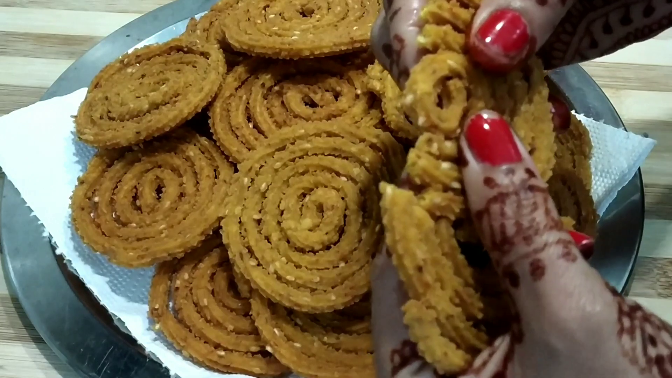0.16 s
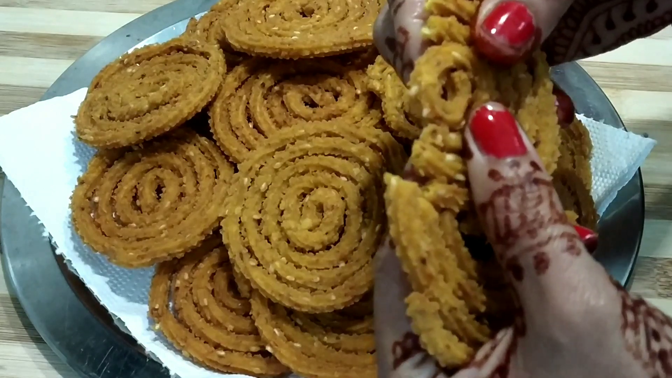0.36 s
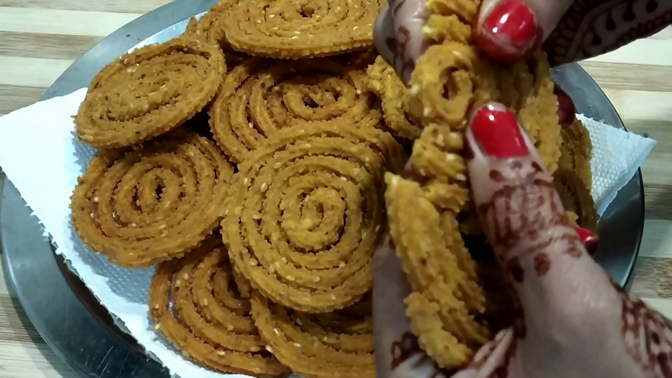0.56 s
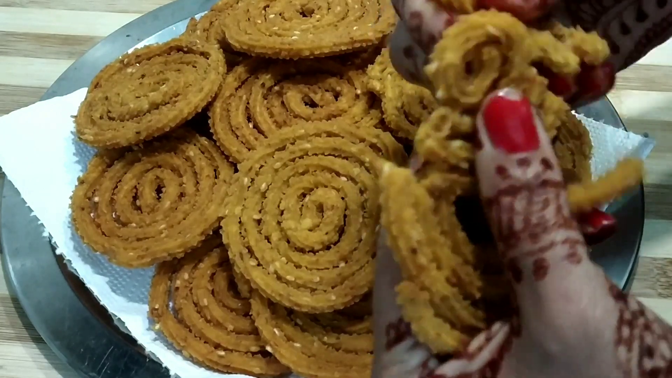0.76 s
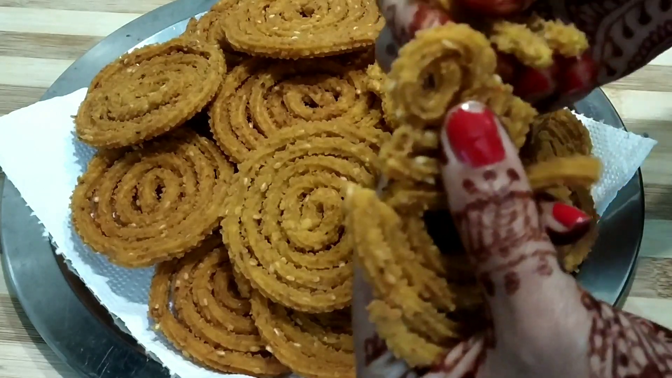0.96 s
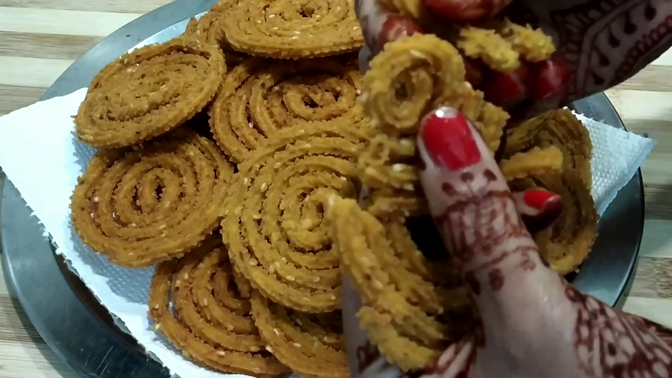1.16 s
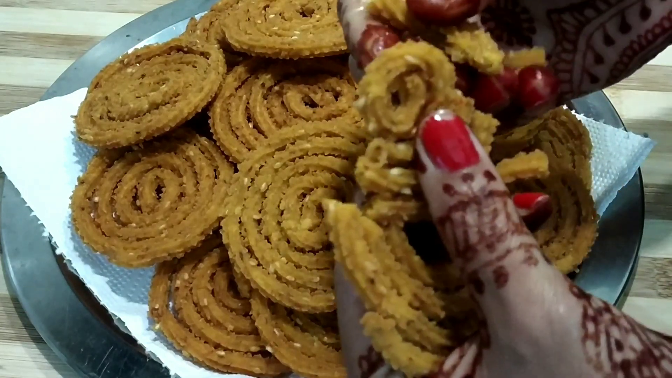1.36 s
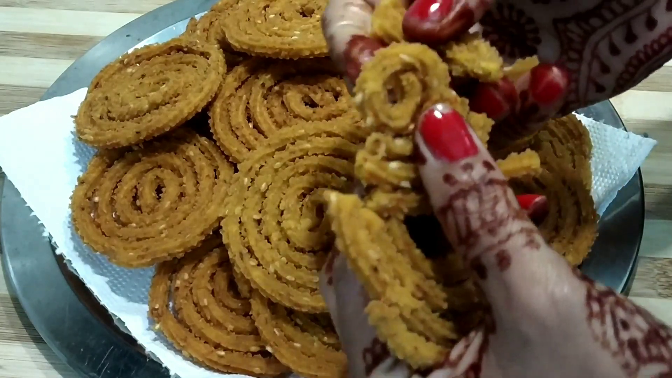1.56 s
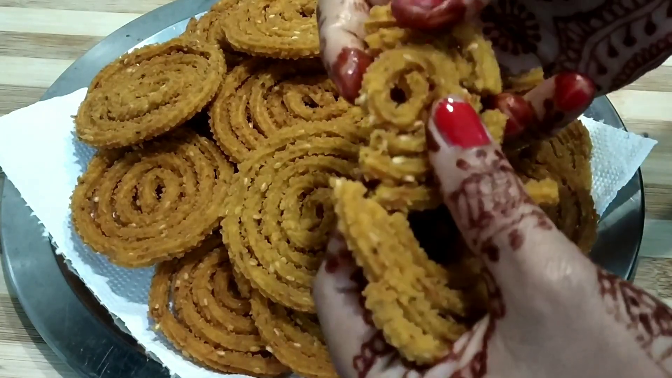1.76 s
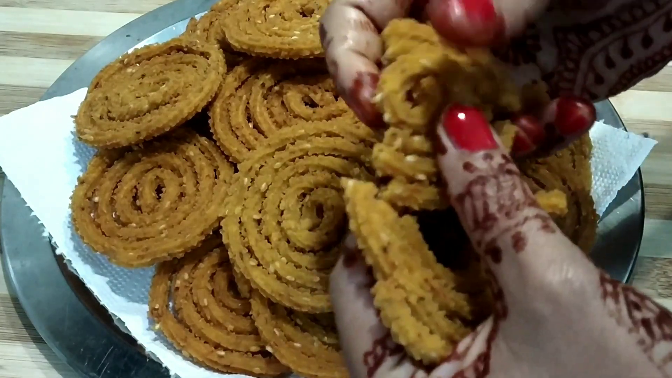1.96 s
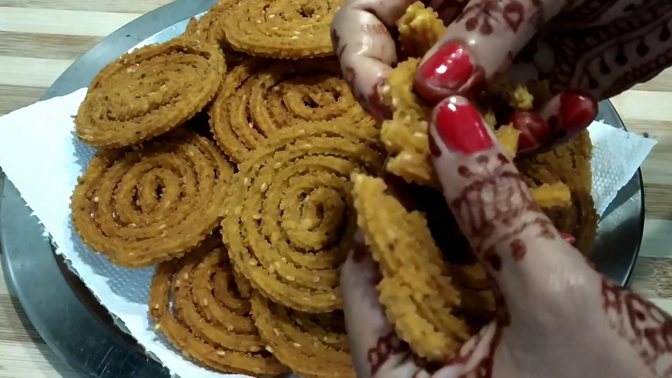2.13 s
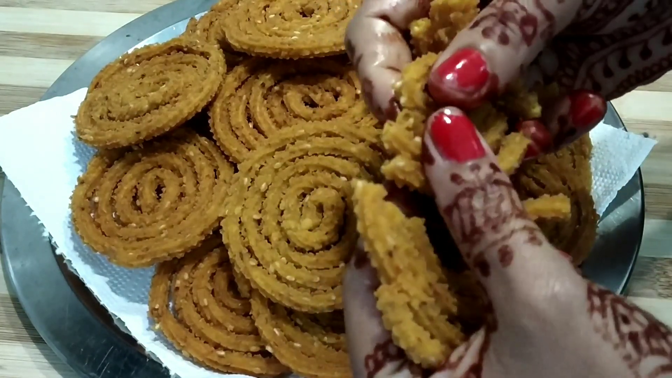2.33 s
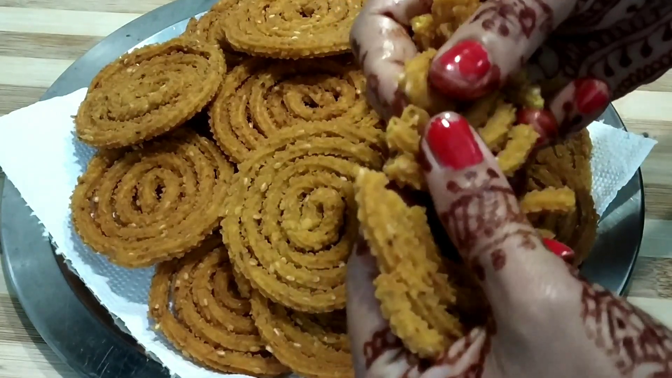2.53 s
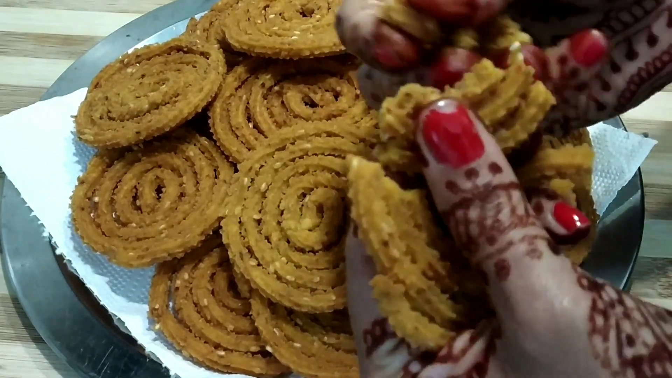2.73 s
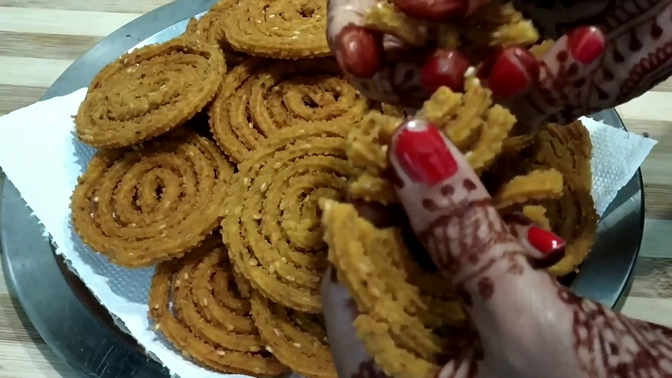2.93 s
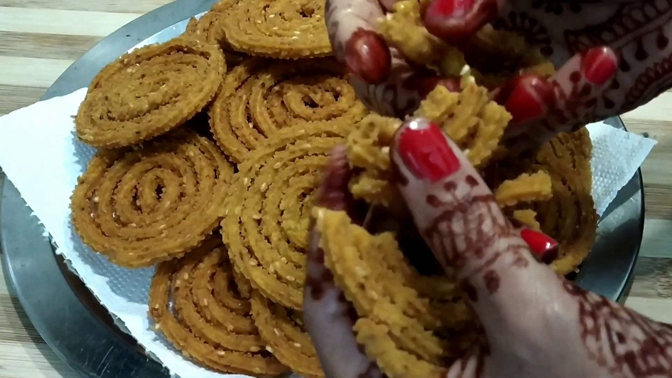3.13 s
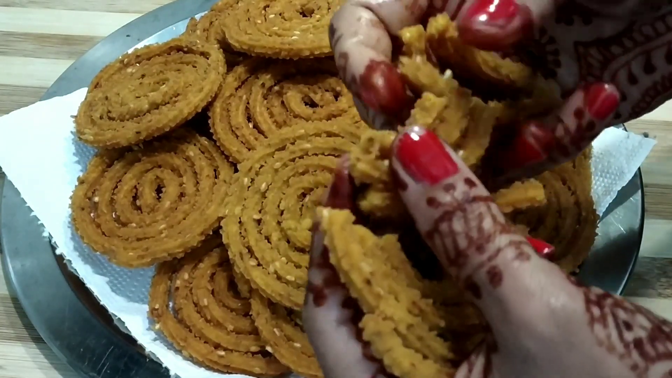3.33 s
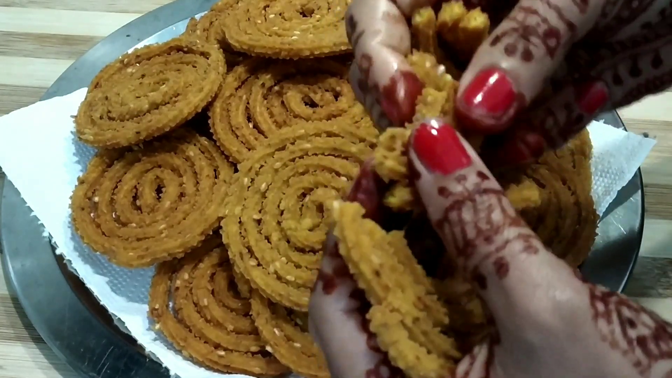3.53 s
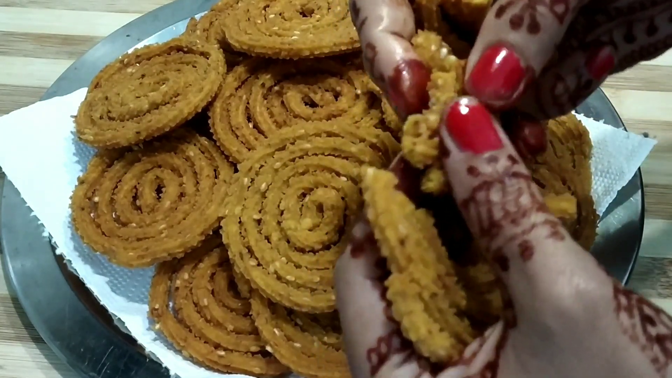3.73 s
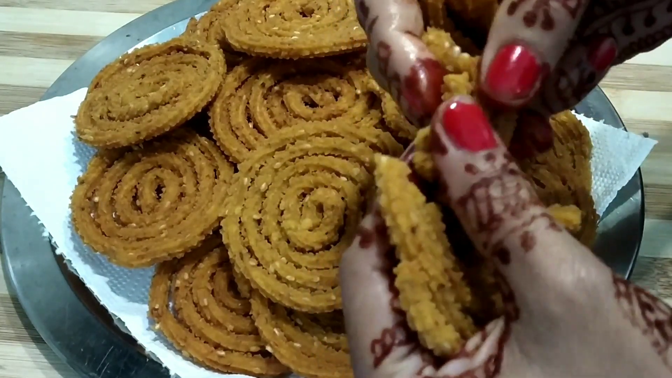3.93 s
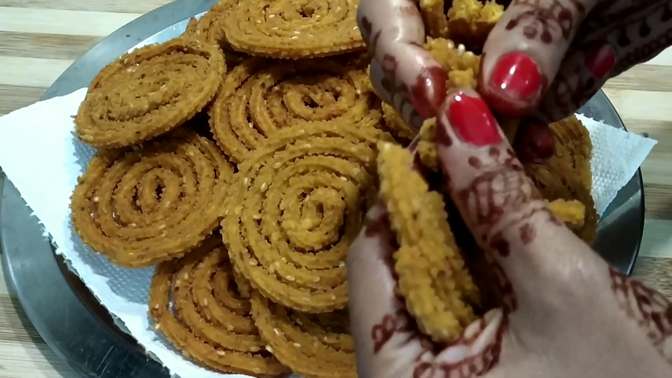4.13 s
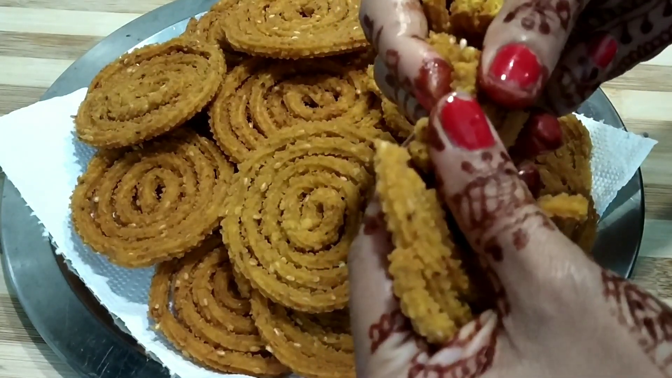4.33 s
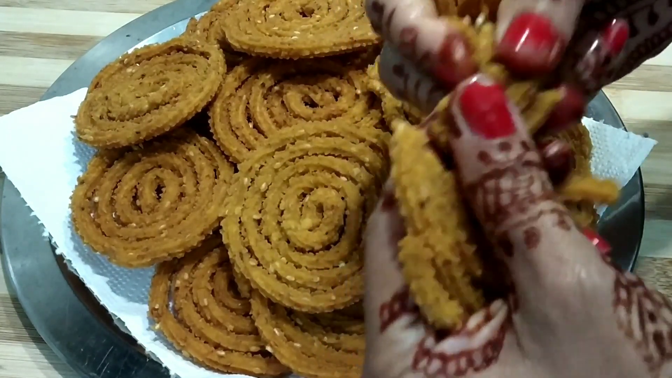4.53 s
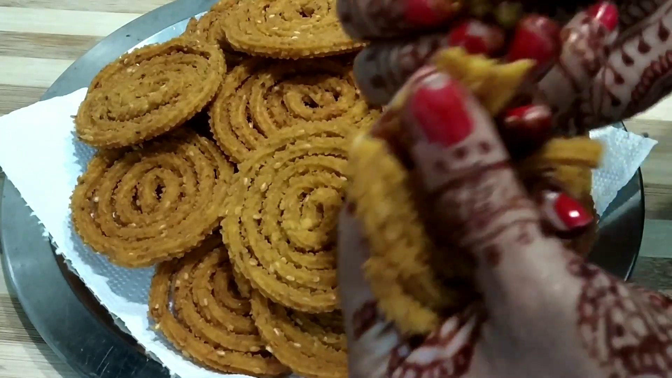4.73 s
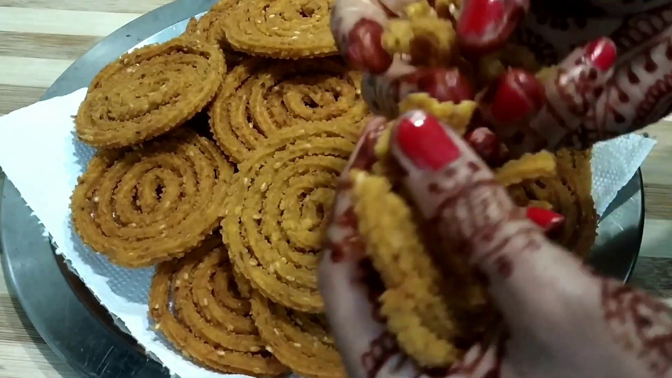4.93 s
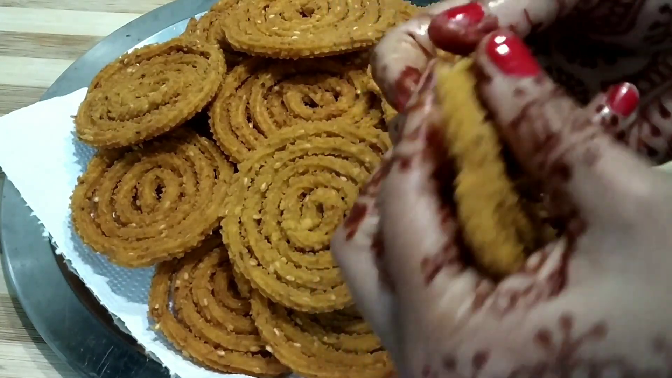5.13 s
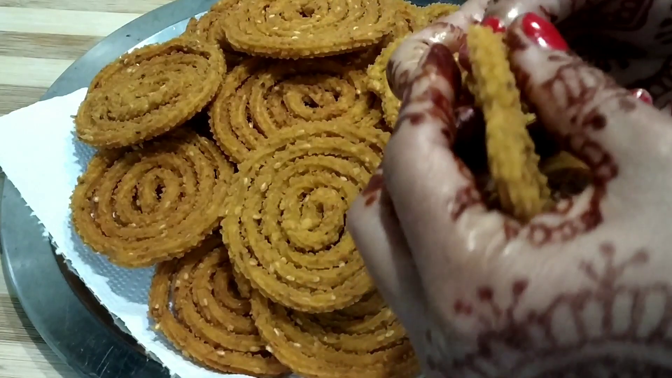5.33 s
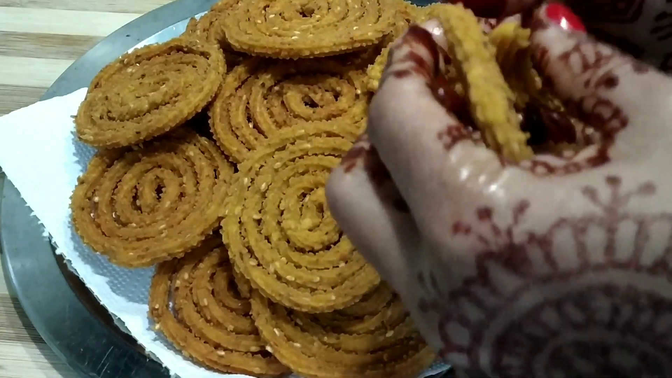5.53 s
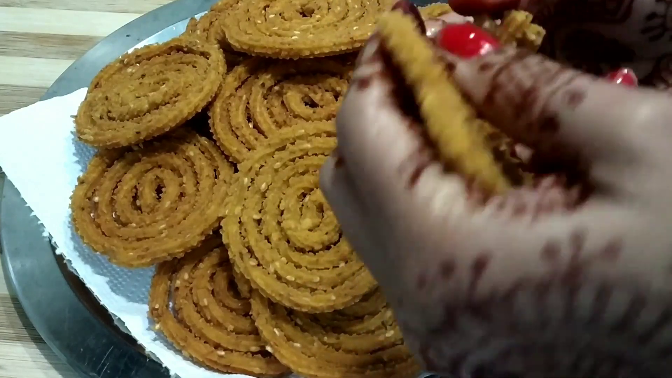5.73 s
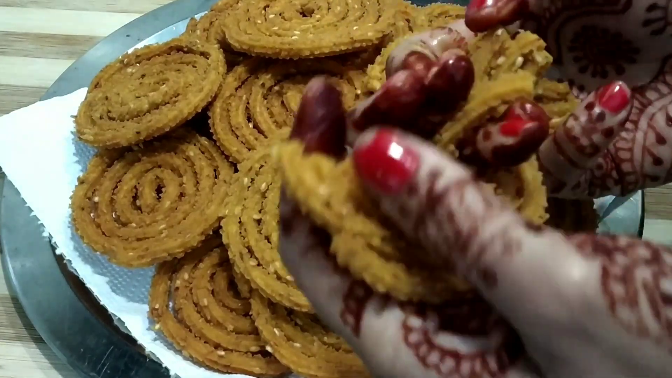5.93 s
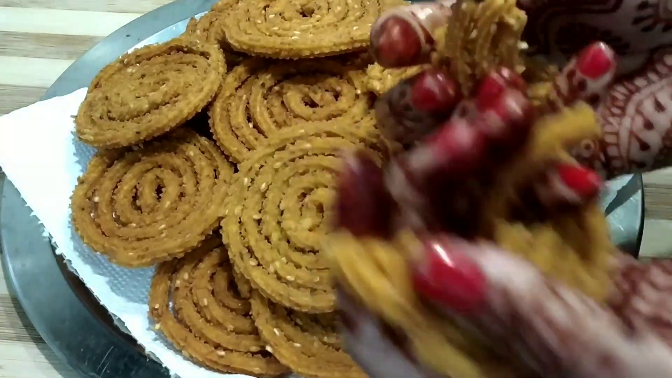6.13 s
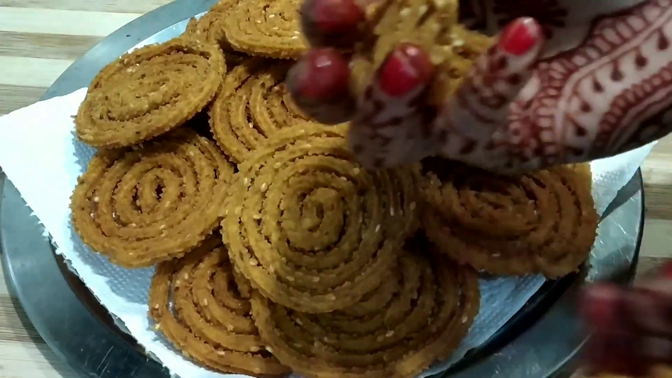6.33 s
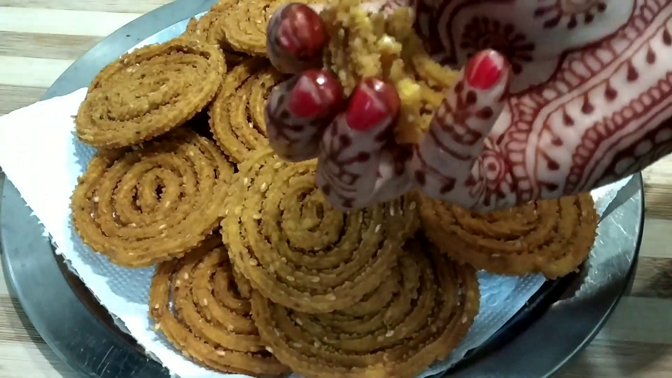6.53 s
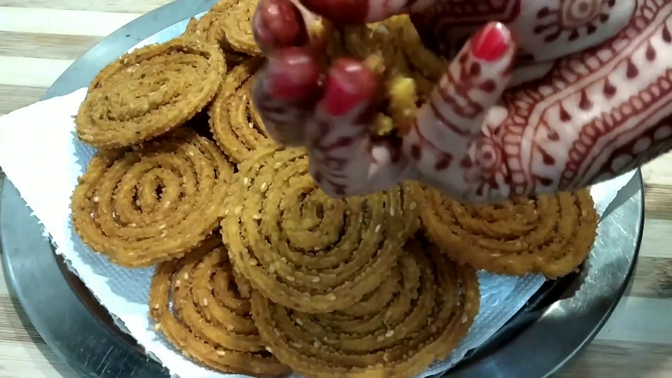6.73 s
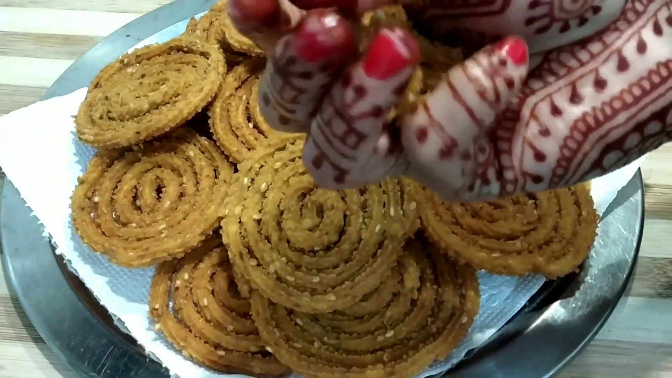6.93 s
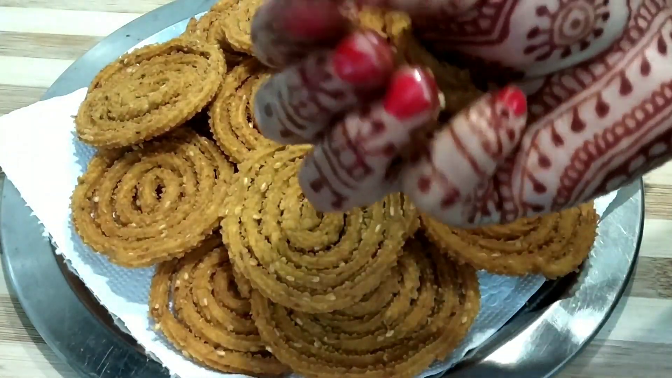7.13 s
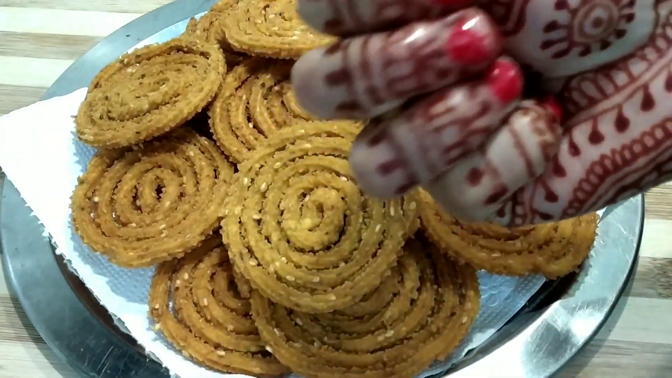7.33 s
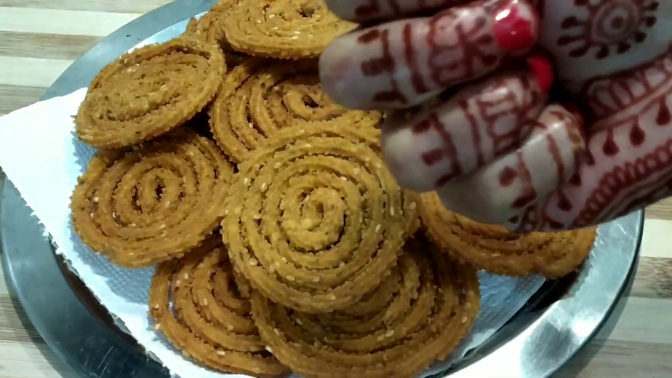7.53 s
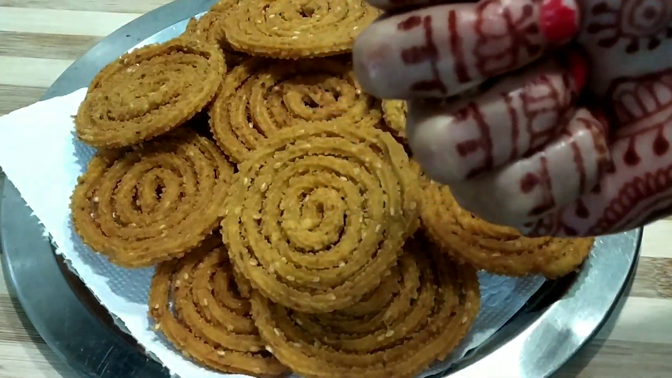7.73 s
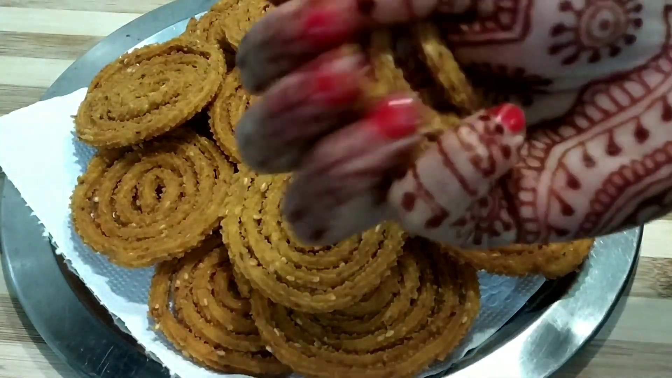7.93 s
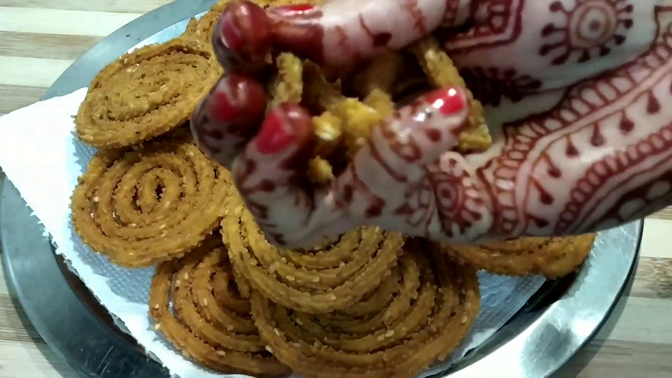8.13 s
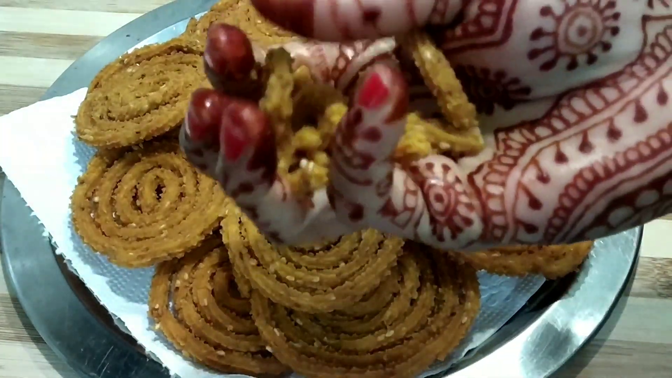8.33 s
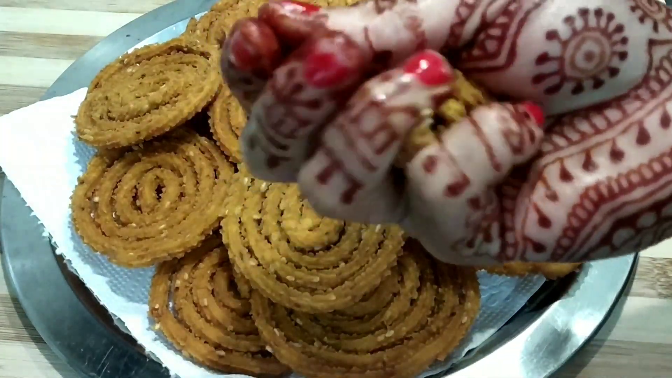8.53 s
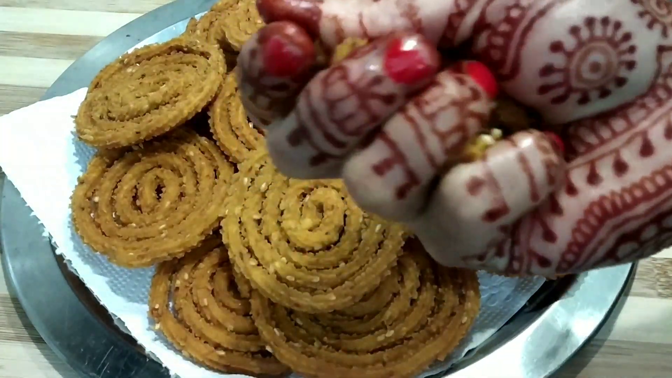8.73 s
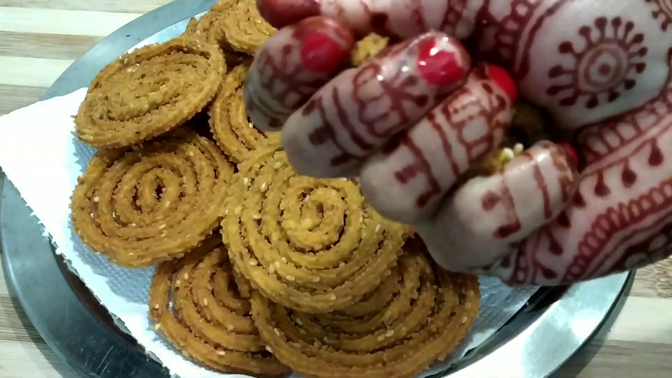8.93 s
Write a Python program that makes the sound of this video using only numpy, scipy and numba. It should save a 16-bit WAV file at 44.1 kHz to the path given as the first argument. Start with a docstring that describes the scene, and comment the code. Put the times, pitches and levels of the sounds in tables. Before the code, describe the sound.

Over a low fan rumble and light hiss, a brittle fried snack is broken by hand three times, each break a sharp, dry crackle close to the microphone. After a quiet spell and a soft rub of skin, it is crushed in a closed hand, crunching in two waves with a slightly hollow ring. The small kitchen adds a short echo.

```python
"""Over fan hum and mic hiss in a small tiled kitchen, hands snap crisp fried spirals close to a phone,
near 0.7, 2.5 and 4.2 s. At 6 s skin rustles as the grip changes. From 7 s to the end a closed fist
crushes one spiral. Each break is a run of tiny fractures: thin shards tick brightly, the hollow of
the hands rings lower, and the room adds a short tail."""
import sys
import numpy as np
from scipy import signal
from scipy.fft import rfft, irfft, next_fast_len
from scipy.io import wavfile
from scipy.ndimage import uniform_filter1d
from numba import njit

SR = 44100
rng = np.random.default_rng(int(sys.argv[2]) if len(sys.argv) > 2 else 0)


def file_out(sig):
    """Save sig as 16-bit WAV at sys.argv[1]."""
    # one column per channel
    cols = np.atleast_2d(sig).T
    # limit, then scale
    lim = np.clip(cols, -1, 1)
    pcm = np.round(lim * 32767).astype(np.int16)
    wavfile.write(sys.argv[1], SR, pcm)


N = 400428


def undb(db):
    """Decibels to gain."""
    return 10 ** (np.asarray(db) / 20)


def shape(x, points):
    """Filter x by (freq_hz, gain_db) points joined on a log-frequency axis."""
    hz, db = np.transpose(points)
    size = next_fast_len(N)
    bin_hz = np.maximum(np.arange(size // 2 + 1) * SR / size, 1)
    gain = undb(np.interp(np.log(bin_hz), np.log(hz), db))
    return irfft(rfft(x, size) * gain, size)[..., :N]


def walk(rate_hz):
    """Slewed random steps, spread near 1."""
    hold = int(SR / rate_hz)
    return uniform_filter1d(np.repeat(rng.standard_normal(N // hold + 1), hold), hold)[:N]


@njit
def grains(n, at_sample, hz, cycles, gain):
    """Damped rings of energy gain^2, each falling 20 dB per `cycles` periods."""
    out = np.zeros(n)
    for g in range(len(at_sample)):
        first = int(np.ceil(at_sample[g]))
        damp = np.log(10.) * hz[g] / cycles[g]
        pole = (2j * np.pi * hz[g] - damp) / SR
        phasor = gain[g] * np.sqrt(4 * damp) * np.exp(pole * (first - at_sample[g]))
        step = np.exp(pole)
        for j in range(max(first, 0), min(n, first + int(3 * cycles[g] * SR / hz[g]))):
            out[j] += phasor.imag
            phasor *= step
    return out


def air(noise_db=-59.5, split_hz=900, flicker_db=0.5, waver_db=1.5, common_share=0.25):
    """Steady mic hiss; fan rumble that swells and flickers; faint motor tones."""
    # fan rumble and hiss spectrum: freq_hz, density_db
    spectrum = [(30, -59), (167, -6.5), (235, 1), (399, -3.5), (792, -7.5), (1030, -6.5), (2050, -8.5),
                (16000, -9.5)]
    # swell below split_hz: time_s, gain_db
    rumble_swell = [(0, 8), (2, 5), (6, 5), (9.08, 7)]
    # fan motor tones: pitch_hz, level_db
    motor_tones = [(231.5, -80.5), (1061, -76)]
    t = np.arange(N) / SR
    noise = shape(rng.standard_normal((3, N)), spectrum)  # left, right, common
    noise = noise * undb(noise_db) / noise.std()
    low = signal.sosfiltfilt(signal.butter(2, split_hz, fs=SR, output="sos"), noise)
    hiss = noise[:2] - low[:2]
    swell = undb(np.interp(t, *np.transpose(rumble_swell)))
    rumble = np.sqrt(1 - common_share) * low[:2] + np.sqrt(common_share) * low[2]
    rumble = rumble * swell * undb(flicker_db * walk(25))
    hum = 0
    for hz, db in motor_tones:
        gain = (swell if hz < split_hz else 1) * undb(db + waver_db * walk(5.4))
        hum += gain * np.sin(2 * np.pi * hz * t + 0.28 * walk(2.4))
    return hiss + rumble + hum


def kitchen(x, tail_db=-33, onset_s=0.00012):
    """Add the tiled room's tail: decaying octave bands of noise, different at each mic port."""
    # room decay: freq_hz, t60_s
    decay = [(500, 0.25), (4000, 0.42), (14000, 0.28)]
    hz, t60_s = np.transpose(decay)
    t = np.arange(SR // 2) / SR
    tail = 0
    for centre_hz in 250 * 2 ** np.arange(7):
        edges_hz = [centre_hz / np.sqrt(2), min(centre_hz * np.sqrt(2), .49 * SR)]
        band = signal.butter(2, edges_hz, "bandpass", fs=SR, output="sos")
        fall = np.exp(-np.log(1000) * t / np.interp(np.log(centre_hz), np.log(hz), t60_s))
        tail += signal.sosfilt(band, rng.standard_normal((2, len(t)))) * fall
    tail = tail * undb(tail_db) * (1 - np.exp(-t / onset_s))
    return x + signal.fftconvolve(x.mean(axis=0)[None], tail, axes=1)[:, :N]


def rustle(flicker_db=3.5):
    """The grip changes: soft, uneven friction of skin on skin."""
    # rubbing envelope: time_s, level_db
    envelope = [(6.0, -85), (6.1, -57), (6.4, -56), (6.901, -60)]
    # friction spectrum: freq_hz, density_db
    spectrum = [(150, -10), (350, 2.5), (3500, -2.5), (4750, 0), (5600, -2.5), (12000, -4)]
    noise = shape(rng.standard_normal((2, N)), spectrum)
    level_db = np.interp(np.arange(N) / SR, *np.transpose(envelope), left=-150, right=-150)
    return noise / noise.std() * undb(level_db + flicker_db * walk(45))


def knocks(count=6, spread_s=0.00412, detune=0.43, cycles=3.0):
    """A broken piece lands on the pile with a dull knock: a few damped rings of scattered pitch, centred."""
    # knocks: start_s, energy_db, pitch_hz
    landings = [(0.712, -73.5, 710), (0.743, -69, 295), (2.618, -77, 450), (4.108, -77, 1003),
                (4.219, -82, 780), (4.521, -76, 860)]
    start_s, energy_db, pitch_hz = np.transpose(landings)[:, :, None]
    late, tune = np.moveaxis(rng.random((len(start_s), count, 2)), 2, 0)
    at_sample = (start_s + spread_s * late).ravel() * SR
    ring_hz = (pitch_hz * np.exp(detune * (2 * tune - 1))).ravel()
    gain = np.repeat(undb(energy_db), count) / np.sqrt(count)
    rings = grains(N, at_sample, ring_hz, np.full(len(gain), cycles), gain)
    low_cut = signal.butter(3, 200, "highpass", fs=SR, output="sos")  # small pieces move no bass
    return signal.sosfilt(low_cut, rings)


def fractures(at_s, energy_db, hollow_db, lag_samples=1.0, pan_db=1.0, retune=0.11, ring_scatter_db=5.0):
    """A shard tick and a hollow ring per fracture; each mic port hears it from a different side."""
    # resonance of the cupped hands as their volume changes: time_s, pitch_hz
    hollow_pitch = [(7.27, 2700), (7.42, 2330), (7.7, 2160), (7.9, 3030), (8.7, 3120), (8.9, 2540)]
    # sideways drift of the hands: time_s, left_minus_right_db
    hands_side = [(0.7, 0.5), (2.0, -0.5), (2.6, -3.5), (4.2, -3), (6.8, -11.5), (7.3, 0.6), (8.0, -6.5),
                  (9.0, -3.5)]
    shard_low_hz, shard_high_hz, open_hz_per_db = 4800, 16700, 198
    shard_cycles, hollow_cycles = 2.83, 2.8
    body_hz, body_share = 816, 0.12  # some fractures ring the thick piece instead of the hollow
    fineness, length, pick = rng.random((len(at_s), 3)).T
    detune, polarity, lag, pan, skew, strength = rng.standard_normal((len(at_s), 6)).T
    # open hand: less hollow ring, finer shards
    low_hz = shard_low_hz - open_hz_per_db * np.clip(hollow_db, -30, 0)
    shard_hz = low_hz + (shard_high_hz - low_hz) * fineness
    hollow_hz = np.interp(at_s, *np.transpose(hollow_pitch))
    ring_hz = np.where(pick < body_share, body_hz, hollow_hz) * np.exp(0.2 * detune)
    ring_gain = undb(hollow_db + ring_scatter_db * np.clip(strength, -3, 2))
    side_db = np.interp(at_s, *np.transpose(hands_side)) + pan_db * pan
    thin = signal.butter(3, 3800, "highpass", fs=SR, output="sos")  # tiny shards radiate no lows
    ports = []
    for side in (1, -1):
        at_sample = at_s * SR + side * lag_samples * lag
        gain = np.sign(polarity) * undb(energy_db + side * side_db / 2)
        tick_hz = np.clip(shard_hz * (1 + side * retune * skew), 500, .42 * SR)
        tick = grains(N, at_sample, tick_hz, shard_cycles * (.5 + length), gain)
        ring = grains(N, at_sample, ring_hz, hollow_cycles * (.5 + length), gain * ring_gain)
        ports.append(signal.sosfilt(thin, tick) + ring)
    return np.array(ports)


def pressure_db(at_s, span_db=25):
    """Each squeeze gains span_db over its build-up and loses it over its release; powers add."""
    # finger squeezes: peak_s, level_db, build_s, release_s
    squeezes = [(0.714, -20, 0.023, 0.044), (1.75, -56, 0.42, 0.23), (2.531, -37.5, 0.011, 0.3),
                (3.5, -58, .1, 0.65), (4.21, -27, 0.0091, 0.056), (4.533, -35.5, 0.051, 0.042),
                (7.285, -24.5, 0.051, 0.066), (7.41, -34.5, 0.5, 0.75), (7.62, -36.5, 0.27, 0.39),
                (7.903, -31.5, 0.065, 0.082), (8.15, -51, 0.38, 0.14), (8.505, -36.5, 0.03, 0.77),
                (8.645, -26.5, 0.21, 0.15), (8.87, -30, 0.023, 0.13), (9.051, -37, 0.63, 0.33)]
    peak_s, level_db, build_s, release_s = np.transpose(squeezes)[:, :, None]
    away = np.where(at_s < peak_s, (peak_s - at_s) / build_s, (at_s - peak_s) / release_s)
    power = undb(level_db - span_db * np.minimum(away, 6)) ** 2
    return 10 * np.log10(power.sum(axis=0))


def grinding(count=30000, scatter_db=2.5, duty_db=-7.5):
    """Squeezed crumbs break at random; few are large, and pressure comes in short patches."""
    # hollow ring as the fist closes: time_s, ring_re_shards_db
    closing = [(2.4, -14.5), (7.3, -6.5), (7.9, -3.5), (8.5, -2.5), (8.7, -4.5)]
    at_s = rng.random(count) * N / SR
    patch_db = (2 * walk(200) + 2.5 * walk(30))[(at_s * SR).astype(int)]
    size_db = duty_db + patch_db + scatter_db * (np.minimum(rng.exponential(size=count), 4.5) - 1)
    energy_db = pressure_db(at_s) + size_db + 10 * np.log10(N / SR / count)
    return fractures(at_s, energy_db, np.interp(at_s, *np.transpose(closing)))


def crumbs(count=70, faint_db=-59.0, scatter_db=1.5, hollow_db=-2.5):
    """Faint random breaks in the held snack: time_s, level_db, ring_re_shards_db."""
    when, size, hollow = rng.random((count, 3)).T
    level_db = faint_db - scatter_db * np.log(0.1 + size)
    return np.transpose([when * N / SR, level_db, hollow_db + 10 * (hollow - .5)])


def cracks(count=64, build_ms=1.05, fade_ms=1.6, scatter_db=4.5, main_db=5.0, trail_db=-5.0):
    """A tear builds fast, gives way in one snap and runs out; its fractures divide the energy."""
    # single breaks, level taken over 5 ms: time_s, level_db, ring_re_shards_db
    breaks = [(0.1497, -43, -12), (0.591, -49, -34), (0.6516, -46.5, -33), (0.687, -43, -33),
              (0.7055, -26, -25), (0.7135, -28, -8), (0.732, -30, -4.5), (1.7824, -47, -14),
              (1.9042, -53, -7), (1.9683, -56.5, 5.5), (2.065, -46, -11), (2.3375, -52.5, -9),
              (2.438, -44, -6), (2.492, -34, -42), (2.504, -30.5, -15), (2.516, -27.5, -44),
              (2.5535, -29, -19), (2.5793, -31, -10), (2.619, -31, -11.5), (2.8578, -48.5, -13),
              (2.946, -54.5, -5), (3.242, -54.5, -5), (3.535, -44.5, -11.5), (3.65, -54.5, -6),
              (3.794, -55, -11), (3.8423, -52, -7.5), (4.1083, -37.5, -13), (4.1484, -49, -21),
              (4.16, -39.5, -8.5), (4.1893, -50, -18), (4.2053, -30.5, -19), (4.255, -43, -7),
              (4.386, -49.5, -35), (4.498, -53, -4), (4.522, -37.5, -19), (4.6596, -44, -12),
              (4.7075, -51, -7), (4.7883, -51.5, -7), (4.81, -51.5, -20), (4.827, -45.5, -10.5),
              (5.714, -53.5, -8), (6.671, -48.5, -4), (6.6912, -47.5, -5), (6.733, -46.5, -9.5),
              (6.836, -45, -5.5), (6.8467, -45.5, -17), (6.9433, -48, -10), (6.97, -47, -11),
              (7.0934, -36, -13), (7.14, -41, -19), (7.1627, -30, -14.5), (7.237, -34.5, -10),
              (7.2683, -23.5, -5.5), (7.2727, -29, -3), (7.2839, -25.5, 2), (7.289, -23, -9),
              (7.3062, -25, -5), (7.3427, -31.5, 2), (7.3559, -19, -16), (7.3604, -32, 3),
              (7.3858, -23, -1), (7.4215, -41, 4), (7.4371, -40.5, 8), (7.467, -34.5, -15),
              (7.4805, -26.5, -5), (7.491, -32.5, -2), (7.5294, -35.5, 2), (7.542, -40, 12.5),
              (7.5487, -21.5, -7), (7.5845, -26, 3), (7.5914, -25.5, -0.5), (7.5952, -25.5, -19),
              (7.621, -27.5, -2.5), (7.6484, -32.5, 5.5), (7.69, -32.5, -5), (7.721, -36, -2.5),
              (7.807, -38, -40), (7.8228, -40.5, 0), (7.8469, -39.5, -13), (7.869, -37.5, -2),
              (7.893, -43, 4), (7.911, -38, -1), (7.9926, -44.5, 1), (8.018, -35.5, 2), (8.477, -40, -3),
              (8.547, -38, -2), (8.564, -32, -11.5), (8.58, -31.5, -6), (8.606, -33.5, -8),
              (8.6749, -33.5, 4), (8.7325, -36, -33), (8.754, -33, -2.5), (8.7894, -32, -5),
              (8.857, -32, -5), (8.8649, -32.5, 6.5), (8.9379, -29, -7), (8.943, -31, 5), (8.9762, -24, -4),
              (9.0006, -28.5, -0.5), (9.0032, -28, 1), (9.027, -32.5, 2.5), (9.0481, -26.5, 0.5),
              (9.0774, -32.5, -1)]
    time_s, level_db, hollow_db = np.transpose(np.vstack([breaks, crumbs()]))[:, :, None]
    hard_db = .3 * np.minimum(level_db + 33, 0)  # hard breaks are sudden, faint ones crumble
    stretch = np.exp(.3 * rng.standard_normal(time_s.shape)) / np.sqrt(undb(hard_db))
    late, early, size = np.moveaxis(rng.exponential(size=(len(time_s), count, 3)), 2, 0)
    main = np.arange(count) < 5  # the snap itself
    trail = np.arange(count) >= 48  # loose crumbs dropping off afterwards
    offset_ms = stretch * (fade_ms * late - build_ms * np.minimum(early, 2))
    offset_ms = np.where(main, offset_ms / 5, offset_ms) - .5
    offset_ms = np.where(trail, 10 * fade_ms * late, offset_ms)
    share = undb(scatter_db * np.minimum(size, 2) + (main_db + hard_db) * main + trail_db * trail)
    share = share / np.sqrt(np.sum(share ** 2, axis=1, keepdims=True))
    energy_db = level_db + 10 * np.log10(.005) + 20 * np.log10(share)
    return fractures((time_s + offset_ms / 1000).ravel(), energy_db.ravel(), np.repeat(hollow_db, count))


def scene():
    """Breaking snack with room tail, plus knocks, skin rustle, fan and hiss."""
    # radiation of small pieces, weak in the bass: freq_hz, gain_db
    radiation = [(150, -24.5), (1000, -10.5), (2300, -5.5), (4500, -2), (6000, 0.5), (8500, 3), (15000, 3)]
    snack = shape(cracks() + grinding(), radiation)
    return kitchen(snack) + knocks() + rustle() + air()


def record(dry):
    """Phone mics: left port less sensitive, bass and top cut."""
    # port imbalance: freq_hz, left_minus_right_db
    balance = [(60, -1), (400, -5), (8000, -6), (15000, -4)]
    bottom_hz, top_hz = 60, 15780
    ports = np.array([shape(channel, [(hz, side * db / 2) for hz, db in balance])
                      for channel, side in zip(dry, (1, -1))])
    ports = signal.sosfilt(signal.butter(1, bottom_hz, "highpass", fs=SR, output="sos"), ports)
    return signal.sosfilt(signal.ellip(12, .3, 75, top_hz, fs=SR, output="sos"), ports)


dry = scene()
out = record(dry)
file_out(out)
```